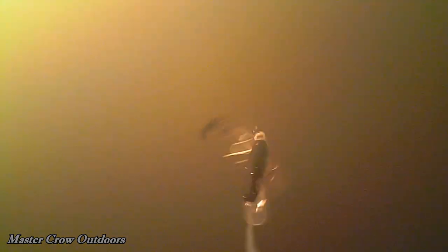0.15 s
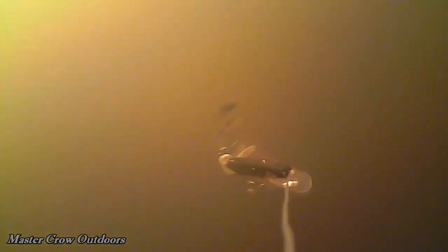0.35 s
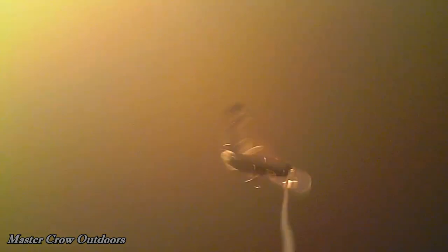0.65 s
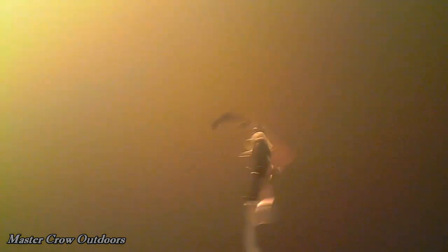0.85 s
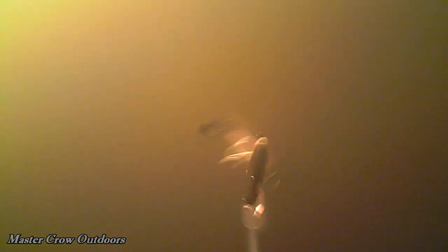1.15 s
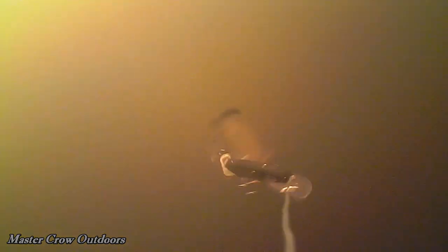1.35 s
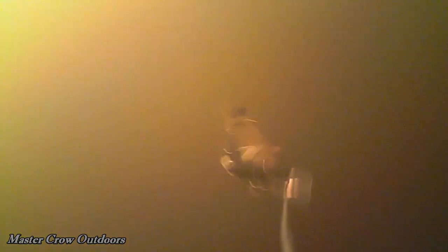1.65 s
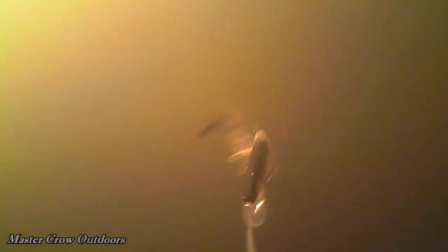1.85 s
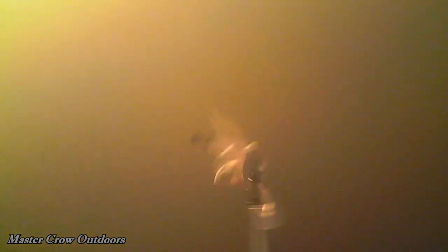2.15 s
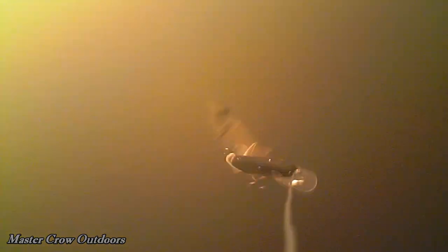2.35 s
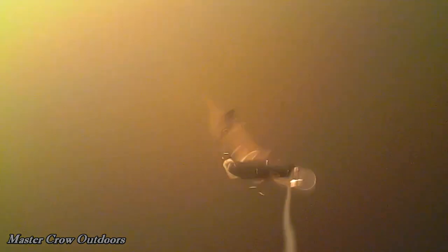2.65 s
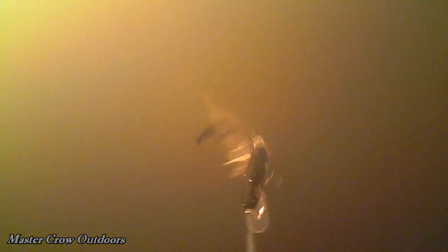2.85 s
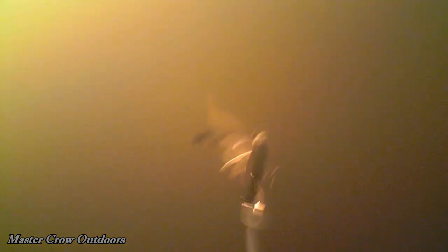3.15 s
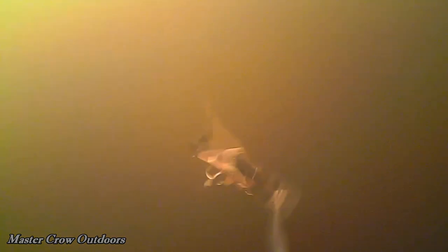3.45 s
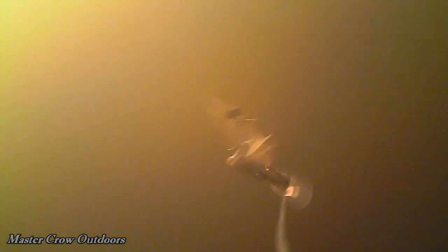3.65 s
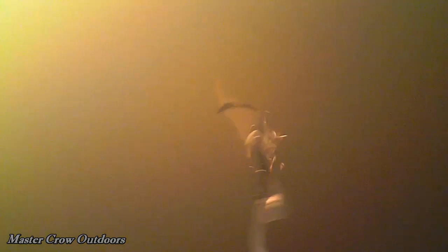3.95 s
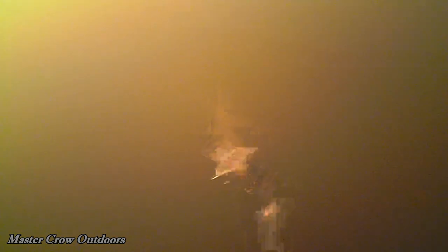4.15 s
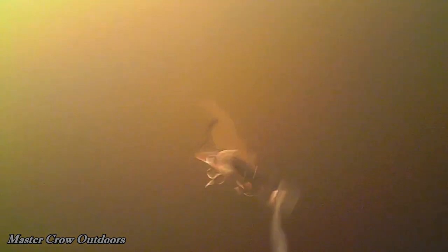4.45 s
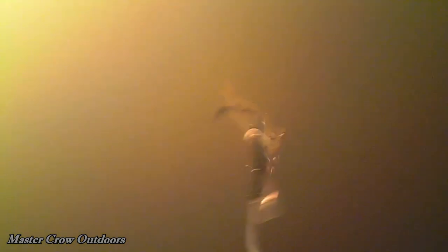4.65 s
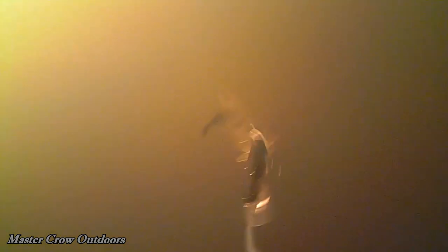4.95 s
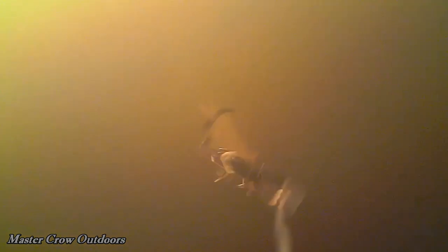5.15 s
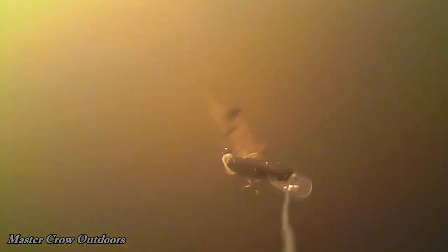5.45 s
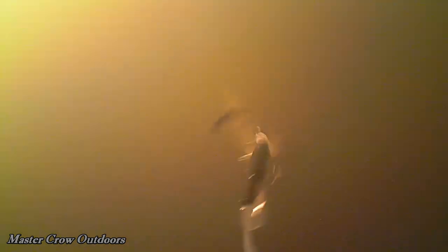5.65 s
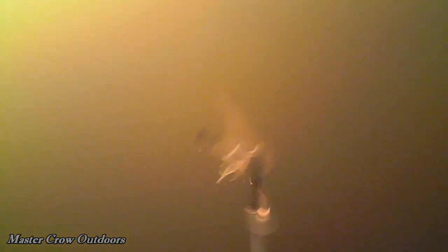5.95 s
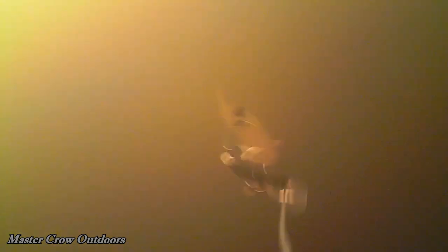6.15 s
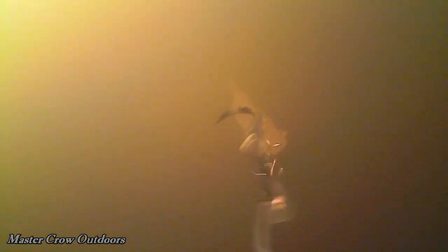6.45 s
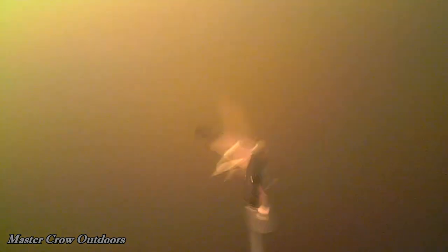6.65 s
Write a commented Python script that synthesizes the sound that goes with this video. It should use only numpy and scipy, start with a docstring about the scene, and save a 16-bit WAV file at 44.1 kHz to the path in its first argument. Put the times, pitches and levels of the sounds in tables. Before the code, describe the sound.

From 0 to about 7 seconds, a low river rumble and soft wash run continuously, boxy and close, as heard inside a sealed housing towed underwater. Just ahead a lure wobbles, an easy swing then a harder pull, together about six strokes a second. Each brings dry mid-pitched ticks, single snaps or quick ratchets about a hundredth of a second apart, over fine chatter and grainy rubbing. Short rough squeaks rise in pitch as the line tightens, and tiny bubbles gurgle. Clear snaps land near 0.6, 0.9 and 1.6 seconds; the ticking grows stronger from 2.3, with the loudest snap and a bright metallic ping near 2.9. Dense clicks continue around 3.7 to 5.1, with small hook scrapes near 3.5, 3.8 and 4.8. Another ping comes near 5.8, then somewhat lighter ticking, and a low surge of flow near 6.7 before it cuts off mid-motion.

```python
"""A river's low rumble and steady wash run throughout, heard from inside a housing drawn underwater by a boat.
A lure wobbles on its line just ahead, about six swings a second: its swivel and line stick and slip in
sharp ticks, short noisy forces that ring the resonances of the housing and tackle, over fine chatter and
rubbing. Bubbles gurgle as rising sine rings, the line squeaks in short rising tones, and small metal parts
ping, jingle and scrape through high resonances."""
import sys
import numpy as np
from scipy import signal
from scipy.fft import rfft, irfft
from scipy.io import wavfile

SR = 44100
rng = np.random.default_rng(int(sys.argv[2]) if len(sys.argv) > 2 else 0)


def unload_audio(sound):
    """Save the sound as a 16-bit wav file, at the path given as the first command line argument."""
    columns = np.transpose(np.atleast_2d(sound))
    # keep every value between -1 and 1, then stretch to whole-number steps
    steps = np.round(np.clip(columns, -1, 1) * 32767)
    wavfile.write(sys.argv[1], SR, steps.astype(np.int16))


N = 300321
TIME = np.arange(N) / SR

# resonances of the housing and tackle, from deep shell to bright metal:
# centre_hz [Hz], width_hz [Hz], relative_level_db [dB]
SHELL_MODES = [(113, 45, -5), (210.5, 18.2, 3.5), (280.6, 50.6, -2), (390.5, 20.7, -4.5), (621, 267, -8.5),
               (837, 76, -3)]
BODY_MODES = [(1158, 212, 6), (1390, 438, 9.5), (1526, 405, 10), (1792, 244, 3.5), (2065, 256, 4.5),
              (2346, 162, -0.5)]
HARD_MODES = [(2680, 740, 0), (3201, 226, 3.5), (3960, 370, -9.5), (4760, 280, -4), (5120, 340, -6.5),
              (5900, 560, -10.5), (6075, 185, -7.5), (6800, 750, -17.5), (7620, 280, -9), (9300, 300, -52)]
RASP_MODE = [(3750, 440, 0)]
METAL_MODES = [(10620, 210, 14), (11180, 480, 0.5), (13500, 270, -10)]
# each wobble of the lure, an easy swing back and then a hard pull, with levels ahead of the layer trims:
# back_crest_s [s], back_level_db [dB], pull_crest_s [s], pull_level_db [dB]
WOBBLES = [(.095, -46.5, .25, -46.5), (0.439, -48, .61, -45.5), (0.766, -46, .925, -46.5),
           (1.092, -46.5, 1.28, -42.5), (1.432, -46, 1.622, -44), (1.789, -44.5, 1.962, -46),
           (2.106, -46, 2.29, -42.5), (2.436, -43.5, 2.605, -41.5), (2.779, -44.5, 2.938, -41.5),
           (3.104, -45.5, 3.29, -45), (3.467, -50, 3.66, -43), (3.809, -45, 3.998, -42),
           (4.148, -44, 4.346, -42), (4.497, -44, 4.699, -44), (4.861, -47, 5.048, -44),
           (5.206, -43, 5.392, -42), (5.565, -44.5, 5.76, -46), (5.916, -46, 6.105, -45.5),
           (6.298, -48.5, 6.485, -44.5), (6.656, -44.5, 6.83, -48)]


def from_db(db):
    """Turns decibels into an amplitude factor."""
    return 10 ** (np.asarray(db) / 20)


def rms_one(x):
    """Scales a sound to an rms of 1."""
    return x / np.sqrt(np.mean(x ** 2) + 1e-20)


def cut(x, hz, kind, order=2):
    """Butterworth filter; kind "low" keeps the lows, "high" the highs."""
    return signal.sosfilt(signal.butter(order, min(hz, .45 * SR), kind, fs=SR, output="sos"), x)


def coloured_noise(spectrum):
    """Steady noise with a given spectrum; rms 1."""
    hz, db = np.transpose(spectrum)
    bins = np.maximum(np.fft.rfftfreq(N, 1 / SR), 1)
    gain = from_db(np.interp(np.log(bins), np.log(hz), db))
    return rms_one(irfft(rfft(rng.standard_normal(N)) * gain, N))


def swell(crests, rise_s, fall_s, heights=1):
    """A sum of smooth humps, one at each crest."""
    coarse = TIME[::64]  # slow curves need few points
    age = coarse[:, None] - crests
    humps = np.exp(-(age / np.where(age < 0, rise_s, fall_s)) ** 2)
    return np.interp(TIME, coarse, np.sum(heights * humps, axis=1))


def load(lag_s=0):
    """Strength of the rubbing: it swells and fades with every swing back and every pull."""
    back, back_db, pull, pull_db = np.transpose(WOBBLES)
    easy = swell(back + lag_s, rise_s=0.044, fall_s=0.052, heights=from_db(back_db))
    hard = swell(pull + lag_s, rise_s=.07, fall_s=0.052, heights=from_db(pull_db))
    # at the end of a pull the tension drops suddenly
    let_go_lag_s, let_go_s, let_go_db = 0.083, 0.021, -6.5
    let_go = from_db(let_go_db * swell(pull + lag_s + let_go_lag_s, let_go_s, let_go_s))
    idle_db = -61  # the line never goes quite slack
    return np.sqrt(easy ** 2 + (let_go * hard) ** 2 + from_db(idle_db) ** 2)


def resonate(force, modes, weight=lambda hz: 1):
    """Parallel resonances of alternating sign; weight says how strongly each is struck."""
    out = 0
    for k, (hz, width, db) in enumerate(modes):
        r = np.exp(-np.pi * width / SR)  # a wider mode dies sooner
        poles = [1, -2 * r * np.cos(2 * np.pi * hz / SR), r * r]
        ring = signal.lfilter([1, 0, -1], poles, force + 1e-18)
        gain = (1 - r * r) / 2 * from_db(db) * weight(hz)
        out = out + (-1) ** k * gain * ring
    return out


def focused(centre, focus_db):
    """Where the line slips decides which body modes ring most; they fall off by octaves from that centre."""
    return lambda hz: from_db(-2 * focus_db * np.log2(hz / centre[:, None]) ** 2)


def contacts(scrape_s, snap):
    """One short force per scrape time: a snap, with a noisy scrape that swells and dies."""
    age = np.arange(SR // 25) / SR / scrape_s[:, None]  # in scrape times
    scrape = rng.standard_normal(age.shape) * age * np.exp(-age)
    scrape = scrape / np.linalg.norm(scrape, axis=1, keepdims=True)
    return scrape + snap * (age == 0)


def disperse(force, lag_s):
    """Bending waves travel as the root of frequency, so the lows arrive last; lag_s holds at 1 kHz."""
    length = force.shape[1]
    khz = np.fft.rfftfreq(length, 1 / SR) / 1000
    phase = 4 * np.pi * 1000 * lag_s * np.sqrt(khz)
    return irfft(rfft(force) * np.exp(-1j * phase), length)


def place(times, sounds, level_db):
    """Sets each short sound at its time; its level is its energy spread over 6 ms."""
    sounds = sounds * np.sqrt(.006 * SR / np.sum(sounds ** 2, axis=1, keepdims=True))
    out = np.zeros(N + SR)  # room for tails past the end
    for s, sound, gain in zip(times, sounds, from_db(level_db)):
        start = max(round(s * SR), 0)
        out[start:start + len(sound)] += gain * sound
    return out[:N]


def grains(per_s, spread_db):
    """Tiny slips at random moments, of uneven size and either sign."""
    sizes = from_db(spread_db * np.minimum(rng.exponential(1, N), 3)) * rng.choice([-1, 1], N)
    return sizes * (rng.random(N) < per_s / SR)


def river():
    """Rumble of flow and boat, easing after each pull and surging in eddies, over a steady wash and hiss."""
    # spectra of the rumble and of the wash: frequency_hz [Hz], relative_density_db [dB per Hz]
    rumble_spectrum = [(20, -1), (40, -1.5), (75, 2.5), (120, -1.5), (165, -4), (200, -16), (260, -13.5),
                       (500, -59)]
    water_spectrum = [(100, -5), (210, 0), (290, -15.5), (480, -18), (660, -8), (810, -8.5), (990, -44),
                      (1380, -12.5), (2100, -38), (2700, -22.5), (5000, -25), (10000, -28), (14500, -29.5),
                      (16000, -42)]
    # eddies buffet the housing: crest_s [s], rise_over_flow_db [dB]
    eddy_table = [(1.59, 5), (3.23, 7), (6.72, 7.5)]
    flow_db, water_db = -46, -54
    slack_db, slack_lag_s, slack_s, eddy_s = -4.5, 0.11, 0.061, 0.027
    eddy_crests, eddy_db = np.transpose(eddy_table)
    slack = swell(np.array(WOBBLES)[:, 2] + slack_lag_s, slack_s, slack_s)
    moving_db = flow_db + slack_db * slack + swell(eddy_crests, eddy_s, eddy_s, eddy_db)
    rumble = from_db(moving_db) * coloured_noise(rumble_spectrum)
    return rumble + from_db(water_db) * coloured_noise(water_spectrum)


def slips():
    """All distinct ticks, single snaps and ratcheting runs: times, levels, hardnesses."""
    # the swivel lets go in one loud snap; hardness is treble over body, ahead of the layer trims:
    # start_s [s], level_db [dB], hardness_db [dB]
    snap_table = [(.139, -35, -11.5), (.2735, -31.5, -7), (.314, -39.5, -6), (.4215, -38, -10),
                  (.457, -37.5, -11), (.5786, -45.5, 0), (.6089, -30, -9.5), (.619, -36.5, -17),
                  (.9328, -30, -9.5), (1.0651, -35, -16.5), (1.2759, -33.5, -4), (1.4172, -33.5, -24),
                  (1.6117, -31, -3.5), (1.952, -35, -11), (1.9633, -32, -14), (1.9904, -36.5, -1),
                  (2.0934, -35.5, -21), (2.1099, -31, -7), (2.288, -28.5, -5), (2.3044, -35.5, -15),
                  (2.3179, -35, 0.5), (2.5993, -30, -9), (2.6092, -35, -10), (2.6209, -34.5, -0.5),
                  (2.7448, -34, -10.5), (2.9319, -26, -8.5), (3.0785, -33, -15), (3.1154, -36.5, -6),
                  (3.282, -36, -13), (3.4468, -35, -18), (3.4622, -36, -11), (3.493, -37, -12),
                  (3.6516, -29, -9.5), (3.681, -30.5, 1), (3.6977, -34, -9), (3.7895, -31, -10.5),
                  (3.8356, -29.5, -11), (3.996, -30, -13.5), (4.3779, -31.5, 1.5), (4.4879, -35, -13),
                  (4.69, -30.5, -7), (4.7032, -36, -0.5), (4.7399, -34.5, .5), (4.8599, -31.5, -9),
                  (5.0508, -31, -3.5), (5.0615, -42, 2.5), (5.0804, -33, 3.5), (5.0915, -40.5, 1),
                  (5.1875, -35, -15), (5.6133, -36, -11.5), (5.771, -34, -6), (5.8035, -37, 1),
                  (6.4828, -33.5, -5)]
    # or it ratchets through evenly spaced ticks, with mean level and hardness ahead of the layer trims:
    # first_s [s], last_s [s], level_db [dB], hardness_db [dB]
    run_table = [(0.0766, 0.0872, -37.5, -9.5), (0.648, 0.6563, -38, -7.5), (0.757, 0.7733, -35, -10),
                 (1.3126, 1.324, -35.5, -5), (1.6219, 1.6592, -36, 0), (2.4534, 2.461, -38, -5.5),
                 (2.639, 2.66, -34, 1), (2.9507, 2.9838, -33.5, -1), (3.662, 3.6717, -37.5, -1),
                 (4.024, 4.036, -34.5, -4), (4.1192, 4.1399, -35, -9), (4.168, 4.1915, -32, -7.5),
                 (4.3463, 4.364, -36.5, -2), (5.393, 5.435, -37.5, 2), (6.1088, 6.1545, -38.5, -3),
                 (6.4945, 6.5171, -38.5, 1.5)]
    gap_s = .0104  # approximate: a whole number of gaps fills the run
    arch_db, hardening_db = 4, 1  # a run is strongest in its middle and hardens as it goes
    rows = list(snap_table)
    for first, last, db, hardness in run_table:
        count = round((last - first) / gap_s) + 1
        along = np.linspace(-1, 1, count)
        arch = np.mean(along ** 2) - along ** 2
        rows += zip(np.linspace(first, last, count), db + arch_db * arch, hardness + hardening_db * along)
    return np.transpose(rows)


def ticks(body_db=0.5, hard_db=0.0, thud_db=-6.5, focus_db=9.5, scatter_db=1.5, scrape_s=0.00083,
          softening_db=0.72, tilt_per_db=0.75):
    """Every slip rings the housing; hard ones are brief and reach the high modes, soft ones drag on."""
    s, level, hardness = slips()
    centre = 1840 * 2 ** (.017 * hardness)  # Hz; harder ticks ring higher
    drag_s = scrape_s * from_db(-softening_db * hardness)
    force = disperse(contacts(drag_s, snap=0.92), lag_s=0.000708)

    def chance(hz):
        """Uneven striking of one mode from tick to tick."""
        return from_db(scatter_db * rng.standard_normal((len(s), 1)))

    def tilted(hz):
        """Hardness tilts the striking toward the higher modes, octave by octave."""
        octaves = np.log2(hz / HARD_MODES[0][0])
        return chance(hz) * from_db(tilt_per_db * hardness[:, None] * octaves)

    body = cut(resonate(force, BODY_MODES, focused(centre, focus_db)), 3570, "low", order=4)
    hard = cut(resonate(force, HARD_MODES, tilted), 2100, "high")
    hard = cut(hard, 8900, "low", order=4)
    thud = cut(resonate(force, SHELL_MODES, chance), 1120, "low", order=4)
    placed_body = place(s, body, level + body_db)
    placed_hard = place(s, hard, level + hardness + hard_db)
    return placed_body + placed_hard + place(s, thud, level + thud_db)


def chatter(rub, rasp, gap_s=.011, jitter=.22, uneven_db=10.0, body_db=-1.0, rasp_db=2.5, centre_hz=1600,
            focus_db=19.0):
    """Through each swing the line grips and lets go in small, tightly packed ticks, each with its own colour."""
    chance = rng.standard_normal((3, N // 200))  # rows: spacing, strength, colour
    s = np.cumsum(gap_s * np.exp(jitter * chance[0]))
    force = disperse(contacts(np.full(len(s), .0006), snap=0.66), lag_s=0.00087)
    # a big slip spends the tension: no small one falls right beside it
    nearest_slip_s = np.abs(s[:, None] - slips()[0]).min(axis=1)
    free = (nearest_slip_s > .7 * gap_s) & (s < TIME[-1])
    s, force, chance = s[free], force[free], chance[:, free]
    strength = uneven_db * np.minimum(chance[1], 1)
    colour = focused(centre_hz * np.exp(jitter * chance[2]), focus_db)
    body = cut(resonate(force, BODY_MODES, colour), 3400, "low", order=4)
    hard = cut(cut(resonate(force, HARD_MODES), 4200, "high"), 7800, "low")
    return rub * place(s, body, strength + body_db) + rasp * place(s, hard, strength + rasp_db)


def rubbing(rub, tug, rasp, body_db=-4.0, rasp_db=-3.5, tug_db=-1.0):
    """Between the ticks the line creeps under load, in fine grains through the tackle's resonances."""
    creep = grains(per_s=2000, spread_db=5.5)
    body = rms_one(cut(resonate(creep, BODY_MODES), 2180, "low", order=6))
    hard = rms_one(resonate(creep, RASP_MODE))
    shell = rms_one(cut(resonate(creep, SHELL_MODES), 923, "low", order=4))
    return from_db(body_db) * rub * body + from_db(rasp_db) * rasp * hard + from_db(tug_db) * tug * shell


def gurgle(rub, gap_s=.016, centre_hz=1400, spread=0.19, rise_per_s=18.0, gain_db=1.0):
    """Small bubbles shed on each swing ring briefly, each at its own rising pitch."""
    wait, size = rng.standard_normal((2, N // 300))
    s = np.cumsum(gap_s * np.exp(wait / 2))
    hz = centre_hz * np.exp(spread * np.clip(size, -2, 2))[:, None]
    age = np.arange(SR // 30) / SR
    cycles = hz * (age + rise_per_s * age ** 2 / 2)
    rings = np.sin(2 * np.pi * cycles) * cycles * np.exp(-cycles / 2)  # peaks after two cycles
    heard = s < TIME[-1]
    return rub * place(s[heard], rings[heard], np.full(heard.sum(), gain_db))


def jingle(rub, gain_db=-24.5):
    """The hooks tremble faintly against their rings on every swing: sparse grains through the metal modes."""
    metal = resonate(grains(per_s=50, spread_db=9.0), METAL_MODES)
    return from_db(gain_db) * rub * rms_one(cut(metal, 8500, "high"))


def squeaks(attack_s=0.0036, length_s=0.0055, rise_per_s=8.0, rasp_db=-17.5, roughness=0.1, gain_db=1.0):
    """A short rough tone that rises as the line tightens, with a little rasp on top."""
    # the line takes up the load, with level ahead of gain_db and pitch at the crest:
    # crest_s [s], level_db [dB], pitch_hz [Hz]
    squeak_table = [(.221, -36.5, 1250), (0.403, -41.5, 1580), (.554, -38, 1330), (0.929, -34, 1107),
                    (1.222, -36.5, 1460), (1.559, -32.5, 1113), (1.946, -38, 1160), (2.085, -40, 1570),
                    (2.241, -35, 1540), (2.548, -33, 1265), (2.881, -33.5, 1290), (3.233, -39.5, 1440),
                    (3.279, -36.5, 1220), (3.586, -39, 1390), (3.777, -37.5, 1530), (3.976, -37.5, 1257),
                    (4.316, -35, 1069), (4.681, -38.5, 1650), (4.983, -37, 1370), (5.04, -35.5, 1180),
                    (5.678, -41.5, 1350), (5.744, -37.5, 1106), (6.09, -35.5, 1105), (6.422, -36.5, 1389)]
    s, level, pitch_hz = np.transpose(squeak_table)
    age = np.arange(-SR // 40, SR // 30) / SR  # zero at the crest
    grit = rng.standard_normal((len(s), len(age)))
    cycles = pitch_hz[:, None] * (age + rise_per_s * age ** 2 / 2)
    tone = np.sin(2 * np.pi * cycles + roughness * np.cumsum(grit, axis=1))
    voice = cut(tone, 2300, "low", order=4) + from_db(rasp_db) * rms_one(resonate(grit, RASP_MODE))
    envelope = np.exp(-(age / np.where(age < 0, attack_s, length_s)) ** 2 / 2)
    return place(s + age[0], voice * envelope, level + gain_db)


def pings(gain_db=-8.0):
    """Hooks and rings brush each other and ring very high."""
    # small metal parts touch, with level ahead of gain_db: start_s [s], level_db [dB]
    ping_table = [(.608, -47), (1.195, -54), (1.607, -43), (1.951, -56), (2.601, -43), (2.936, -36),
                  (4.686, -45.5), (4.841, -49), (5.047, -45), (5.526, -49), (5.758, -39.5), (6.272, -48),
                  (6.477, -46)]
    s, level = np.transpose(ping_table)
    brush = contacts(np.full(len(s), .0012), snap=0)
    return place(s, cut(resonate(brush, METAL_MODES), 8420, "high"), level + gain_db)


def scrapes(length_s=0.0059, metal_db=-18.0, gain_db=3.0):
    """A short bright rasp as a hook drags through its ring."""
    # metal drags over metal, with level ahead of gain_db: crest_s [s], level_db [dB]
    scrape_table = [(0.746, -47.5), (1.427, -49), (1.768, -47), (2.588, -55), (3.097, -48), (3.453, -46.5),
                    (3.789, -46), (4.493, -49.5), (4.846, -46)]
    s, level = np.transpose(scrape_table)
    age = np.arange(-SR // 30, SR // 30) / SR  # zero at the crest
    spiky = rng.standard_normal((len(s), len(age))) ** 3  # cubing makes a few grains stand out
    force = spiky * np.exp(-(age / length_s) ** 2 / 2)
    rasp = cut(cut(force, 2600, "high"), 6500, "low")
    rasp = rasp + from_db(metal_db) * 2 * resonate(force, METAL_MODES)
    return place(s + age[0], rasp, level + gain_db)


def scene(tug_db=1.0, rasp_db=-15.5):
    """One load drives the rubbing, the rasp just ahead of it and the tug on the housing just behind."""
    rub = load()
    tug = from_db(tug_db) * load(lag_s=0.009)
    rasp = from_db(rasp_db) * load(lag_s=-0.0036)
    line = ticks() + chatter(rub, rasp) + rubbing(rub, tug, rasp) + squeaks()
    metal = jingle(rub) + pings() + scrapes()
    return (river() + line + gurgle(rub) + metal)[None]


def record(dry):
    """The top is cut steeply above 15.8 kHz by an elliptic low-pass."""
    return signal.sosfilt(signal.ellip(10, .2, 80, 15800, fs=SR, output="sos"), dry)


dry = scene()
out = record(dry)
unload_audio(out)
```